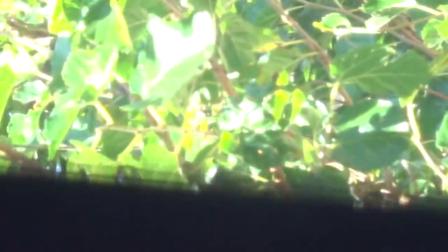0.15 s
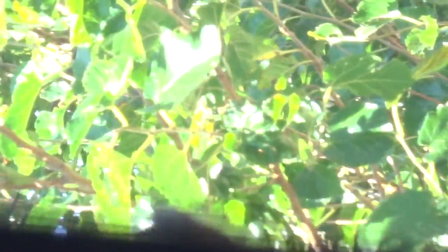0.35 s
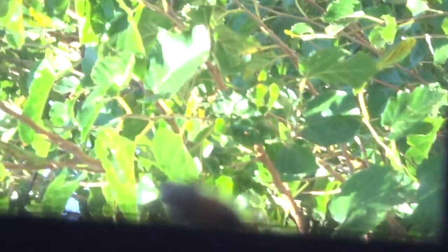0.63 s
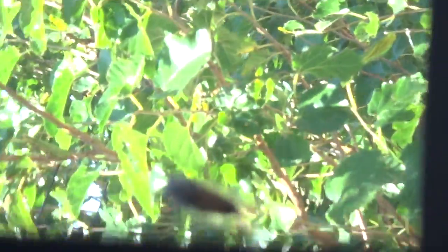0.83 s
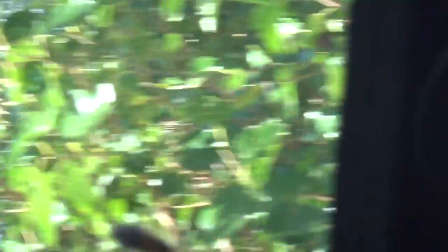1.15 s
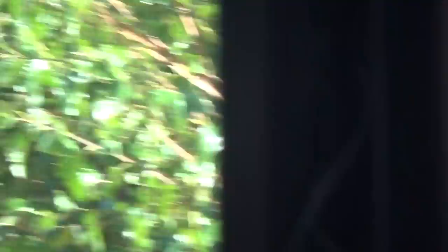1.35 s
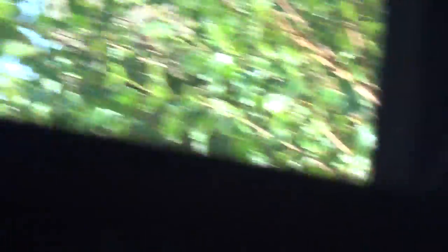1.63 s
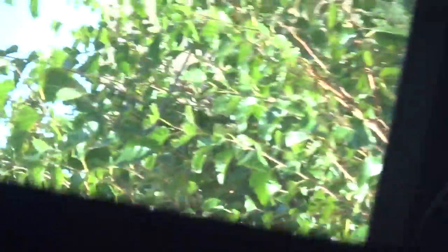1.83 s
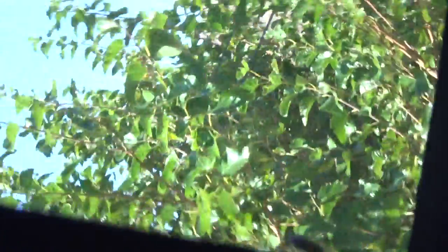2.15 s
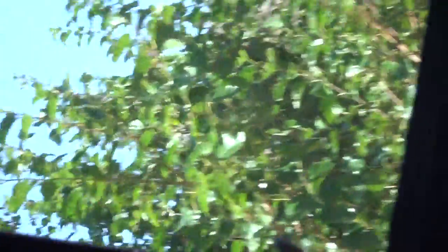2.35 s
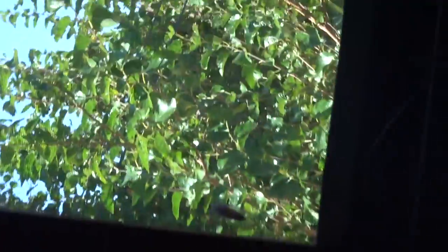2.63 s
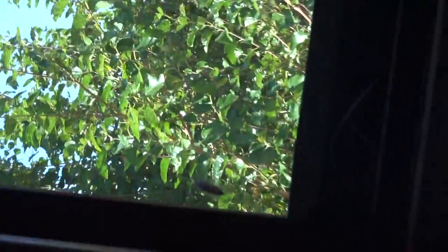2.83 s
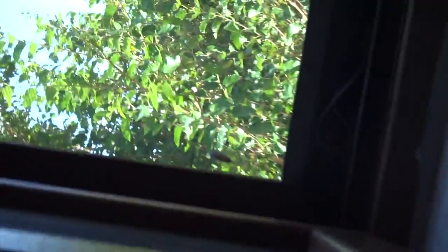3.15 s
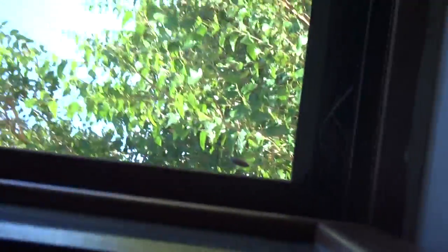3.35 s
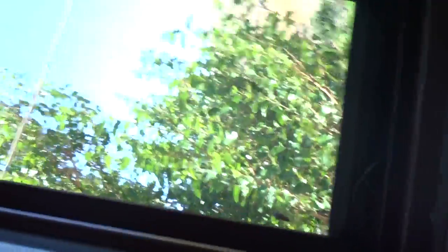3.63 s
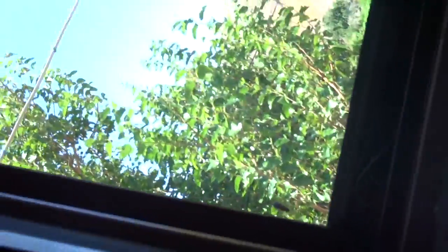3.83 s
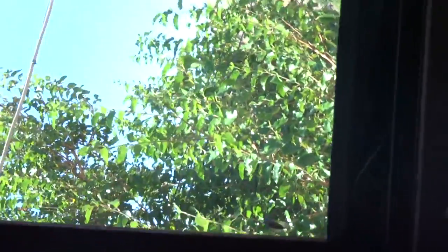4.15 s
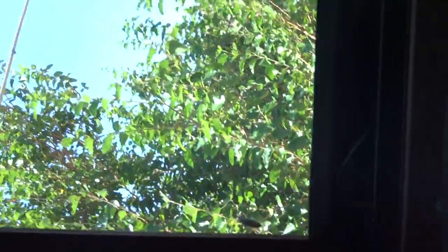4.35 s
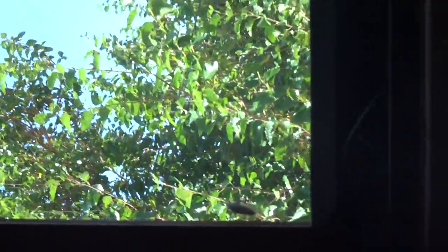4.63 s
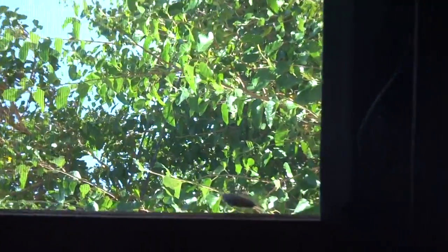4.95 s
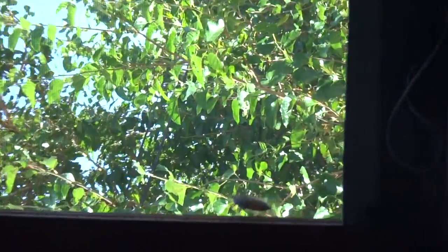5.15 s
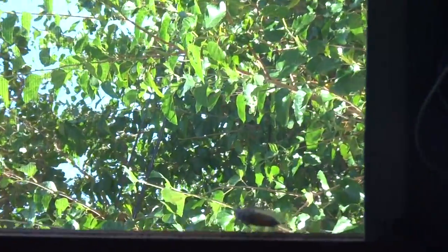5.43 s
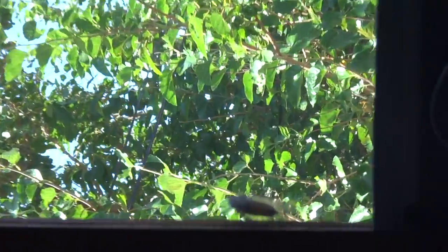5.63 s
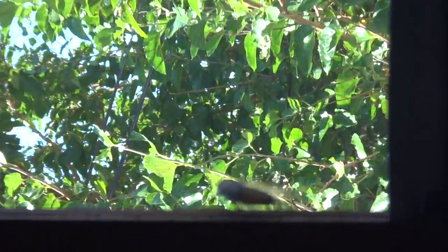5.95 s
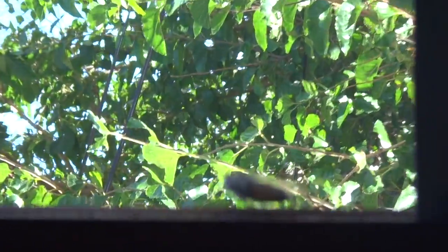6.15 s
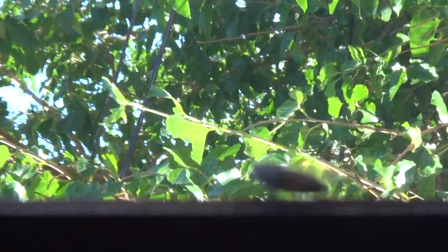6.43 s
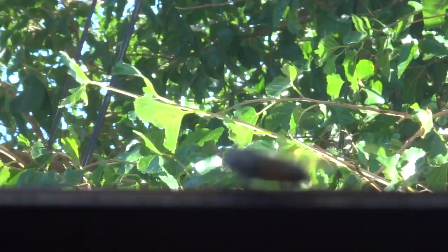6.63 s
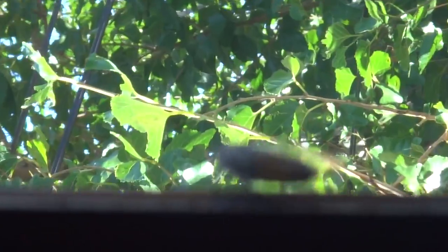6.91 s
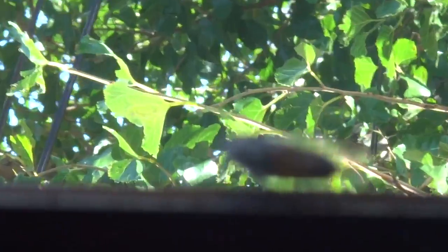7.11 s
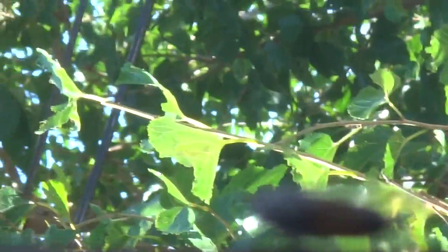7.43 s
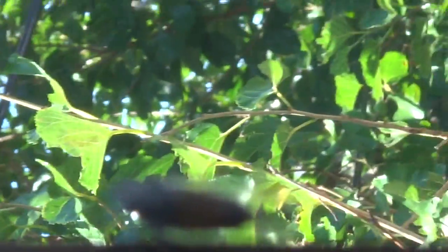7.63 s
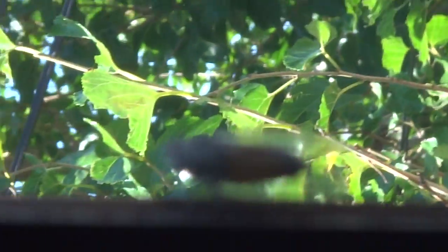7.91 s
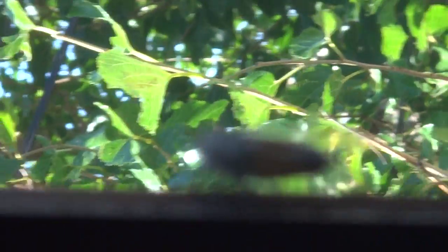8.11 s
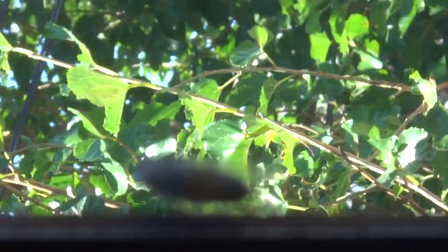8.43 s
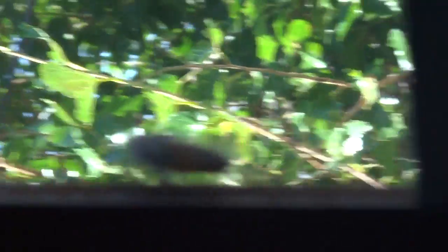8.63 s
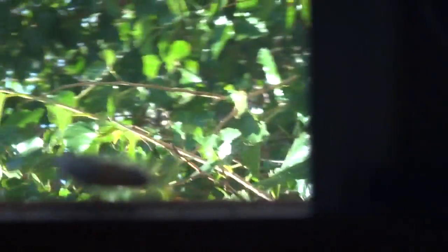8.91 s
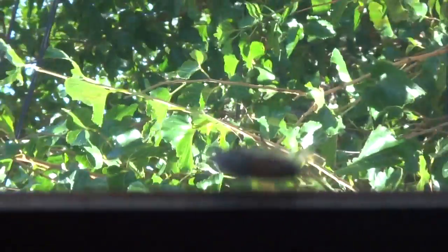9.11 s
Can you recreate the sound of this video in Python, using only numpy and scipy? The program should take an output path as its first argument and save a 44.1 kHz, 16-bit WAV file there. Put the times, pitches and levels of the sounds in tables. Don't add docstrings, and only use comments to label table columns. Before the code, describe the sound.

Harsh metallic cicada pulses repeat steadily at close range near a window, over faint distant cicadas, fingers rubbing plastic and small sharp clicks.

```python
import sys
import numpy as np
from scipy import signal
from scipy.io import wavfile
from scipy.ndimage import uniform_filter1d

SR = 44100
rng = np.random.default_rng(int(sys.argv[2]) if len(sys.argv) > 2 else 0)


def how_loud(loudness_db):
    steps = np.asarray(loudness_db, float) / 20
    return 10 ** steps


def generate_wav(signal):
    frames = np.transpose(np.atleast_2d(signal))
    scaled = np.clip(frames, -1, 1) * 32767
    pcm = np.round(scaled).astype(np.int16)
    wavfile.write(sys.argv[1], SR, pcm)


N = 408807


def evened(x):
    return x / np.sqrt(np.mean(x ** 2) + 1e-20)


def smoothed(x, *sizes):
    for size in sizes:
        x = uniform_filter1d(x, size=size)
    return x


def filtered(x, order, hz, kind):
    return signal.sosfilt(signal.butter(order, hz, kind, fs=SR, output="sos"), x)


def read(points, hz):
    f, value = np.transpose(points)
    return np.interp(np.log(hz + 1), np.log(f + 1), value)


def bump(hz, centre_hz, width_hz):
    return np.exp(-.5 * ((hz - centre_hz) / width_hz) ** 2)


def along(rows, column):
    rows = np.array(rows)
    return np.interp(np.arange(N) / SR, rows[:, 0], rows[:, column])


def ring(db):
    log = np.log(how_loud(np.maximum(db, -100)))
    log = np.concatenate([log, log[-2:0:-1]])
    return np.fft.ifft(np.exp(log - 1j * signal.hilbert(log).imag)).real[:1024]


def noise(spectrum, same=.9, patchy_db=3.5):
    frames, hz = N // 256 + 5, np.fft.rfftfreq(1024, 1 / SR)
    a, b, c, d, patches = rng.standard_normal((frames, 513, 5)).T
    patches = evened(uniform_filter1d(smoothed(patches, 8), size=8, axis=0))
    left = a + 1j * b
    right = same * left + np.sqrt(1 - same ** 2) * (c + 1j * d)
    z = np.array([left, right]) * how_loud(read(spectrum, hz)[:, None] + patchy_db * patches)
    return evened(signal.istft(z, nperseg=1024, noverlap=768)[1][:, :N])


# delay/s, f/Hz, level/dB, treble/dB, top/dB
RIBS = [
    (0, 4300, -.5, -2, 1),
    (.0007, 4750, 0, 3, 1),
    (.0014, 5150, -.8, -2, 0),
    (.0022, 5550, -1.3, -3, -2),
    (.003, 5400, -9, 4, -2),
]
# f/Hz, level/dB
BODY = [(1000, -106), (1700, -57.5), (2270, -27), (3700, -30.5), (4430, -5.5), (4780, -1), (5600, -5),
        (6260, -14.5), (7010, -31), (7700, -15.5), (9030, -26.5), (9920, -9.5), (11600, -30.5),
        (16000, -40.5)]
# t/s, effort/dB, length/s
BURSTS = [(-.02, -27, 0.086), (0.134, -25, 0.074), (0.279, -24.5, 0.085), (0.435, -23, 0.089),
          (0.599, -22.5, 0.086), (0.749, -21.5, 0.088), (0.898, -21, 0.089), (1.045, -21, 0.11),
          (1.2053, -20.5, 0.088), (1.352, -19, 0.075), (1.486, -19.5, 0.081), (1.639, -22.5, 0.1),
          (1.815, -23.5, 0.089), (1.966, -22, 0.083), (2.1213, -22, 0.097), (2.293, -22, 0.097),
          (2.451, -22.5, 0.085), (2.62, -22.5, .11), (2.799, -21, 0.089), (2.962, -21, 0.093),
          (3.108, -21.5, 0.076), (3.242, -21.5, 0.094), (3.398, -22, 0.087), (3.558, -24.5, 0.079),
          (3.697, -22.5, 0.097), (3.858, -22, 0.091), (4.0305, -20.5, 0.097), (4.225, -19.5, .11),
          (4.425, -21, 0.092), (4.626, -24.5, 0.09), (4.825, -23, 0.086), (5.013, -24.5, 0.1),
               (5.206, -23, 0.095), (5.382, -23.5, 0.09), (5.569, -24, 0.079), (5.7224, -23, 0.089),
               (5.9, -22, 0.089), (6.068, -23.5, 0.074), (6.221, -23, 0.08), (6.387, -24, 0.087),
               (6.557, -24.5, 0.089), (6.738, -21, 0.08), (6.921, -19, 0.066), (7.1033, -20, 0.064),
               (7.283, -21, 0.072), (7.439, -20.5, 0.085), (7.609, -20.5, 0.078), (7.76, -20.5, 0.087),
               (7.929, -21.5, 0.093), (8.093, -21, 0.079), (8.263, -22.5, 0.097), (8.45, -25, 0.086),
               (8.6097, -25.5, 0.089), (8.776, -26.5, 0.088), (8.946, -26.5, 0.091), (9.122, -29, 0.098)]


def cicada():
    buckles_per_s, swell_db, release_db_per_s = 228.5, 3.0, 1700
    first_rest_s, rest_spread_s = .0025, .0006
    run_up_s, run_up_buckles = .0013, 2.2
    first_db, first_stretch = 0.5, 1.3
    beat_jitter_s, rib_jitter_s, uneven_db = .00009, .00002, .6
    rib_db, rib_width_hz = 15, 310
    count = np.arange(40)
    snaps = np.zeros((len(RIBS), N))
    for s, effort_db, length in BURSTS:
        late, size = rng.standard_normal((2, len(RIBS) + 1, 40))
        run_up = run_up_s * (1 - np.exp(-np.maximum(count - 1, 0) / run_up_buckles))
        rest = first_rest_s + rest_spread_s * size[-1, 0] + run_up + beat_jitter_s * late[-1]
        beat = count / buckles_per_s + rest * (count > 0)
        effort_db = effort_db + swell_db * beat / length + first_db * (beat == 0)
        effort_db -= release_db_per_s * np.maximum(beat - length + 0.0074, 0)
        stretch = np.where(beat > 0, 1, first_stretch)
        for k, (delay, _, db, _, _) in enumerate(RIBS):
            at = s + beat + delay * stretch + rib_jitter_s * late[k]
            keep = (beat < length + .012) & (at >= 0) & (at < N / SR)
            snaps[k, (at[keep] * SR).astype(int)] += how_loud(effort_db + db + uneven_db * size[k])[keep]

    hz = np.fft.rfftfreq(2048, 1 / SR)
    body_db = read(BODY, hz)
    song = np.zeros(N)
    for k, (_, rib_hz, _, treble_db, top_db) in enumerate(RIBS):
        low_db = 2 * treble_db - 1
        lift_db = rib_db * bump(hz, rib_hz, rib_width_hz) - 7.96 * bump(hz, 5192, 710)
        lift_db += treble_db * bump(hz, 6800, 1170) + top_db * bump(hz, 9900, 900)
        lift_db += low_db * bump(hz, 2440, 650)
        song += signal.oaconvolve(snaps[k], ring(body_db + lift_db))[:N]
    return song * how_loud(19.5) / np.linalg.norm(ring(body_db))


# delay/s, level/dB
FRAME = [(.0006, -25), (.0023, -11.5), (.0038, -9.5), (.0049, -16), (.0061, -22.5), (.0083, -13.5)]
# t/s, turn to the insect as treble/dB, tilt as glint off the pane/dB,
# left-right/dB, room/dB
POSE = [(0, 7, -0.5, -7, 2), (.4, 7, 1, -6.5, -2), (.95, 6.5, 3.5, -7.5, -6.5), (1.5, 4, 2.5, -6.5, -8),
        (1.9, 2.5, -1.5, -8.5, -4.5), (2.7, 0.5, 4, -8, -5.5), (3.3, -2, 4.5, -8, -8.5),
        (3.7, 1, 6, -8, -5), (4.05, -1, 11.5, -6.5, -5), (4.35, 0.5, 6, -8.5, -8),
        (4.9, -2, 10, -8.5, -8.5), (5.55, 1, 3, -9, -9.5), (5.95, -4.5, 8.5, -10, -8.5),
        (6.45, -1, 5, -9.5, -12.5), (7.1, 1, 7.5, -7.5, -8.5), (8.1, 4, 6, -8, -13),
        (8.45, 6, 11, -6.5, -10.5), (9.2, 9.5, 5, -8, -11.5)]


def window_frame(x):
    taps = np.zeros((2, 1024))
    for k, (s, db) in enumerate(FRAME):
        at = round(s * SR)
        taps[0, at + 1 + k % 2] = taps[1, at] = how_loud(db) * (-1) ** k
    sent = x * how_loud(4.5 + 0.62 * along(POSE, 4))
    echoes = signal.oaconvolve(sent[None], taps, axes=1)[:, :N]
    return np.array([np.roll(x, 1), x]) * how_loud(-0.3) + echoes


def toned(x):
    top_db, low_db = 1 - 0.3 * along(POSE, 1), 3.1
    top = filtered(x, 2, 6500, "high")
    low = filtered(x, 2, 3300, "low")
    return x + top * (how_loud(top_db) - 1) + low * (how_loud(low_db) - 1)


# f/Hz, t60/s
ROOM = [(2500, 0.53), (4500, 0.25), (6000, 0.32), (10000, 0.25), (14000, 0.3)]


def room(x):
    same = 0.58
    out, turn = np.zeros((2, N)), np.pi * .9 * np.arange(N) / SR
    for k in range(3):
        taps = np.zeros((2, SR // 3))
        at = np.arange(560, SR // 3 - 20, 20)
        at = at + rng.integers(0, 20, (2, len(at)))
        np.put_along_axis(taps, at, rng.choice([-1., 1.], at.shape), 1)
        taps[1] = same * taps[0] + np.sqrt(1 - same ** 2) * taps[1]
        hz, t, z = signal.stft(taps, SR, nperseg=256)
        tail = signal.istft(z * how_loud(-60 * t / read(ROOM, hz)[:, None]), SR, nperseg=256)[1]
        tail /= np.linalg.norm(tail[0])
        share = np.sqrt(2 / 3) * np.cos(turn + k * np.pi / 3)
        out += signal.oaconvolve((x * share)[None], tail, axes=1)[:, :N]
    return out


# f/Hz, width/Hz, level/dB
MIC = [(2250, 270, 1.5), (3305, 92, 10), (3440, 29, -10.5), (7150, 155, -3), (10140, 79, 2),
       (10900, 140, 2.5), (12050, 130, 6), (13600, 250, -8), (14500, 300, 5), (15400, 300, 5)]
# f/Hz, left-right/dB
LEAN = [(60, 13), (92, -1), (140, 0.0), (210, -10), (330, -11), (500, -5), (770, -7), (1170, -16),
        (1790, 0.5), (2740, 0), (4190, 0.5), (6410, -11.5), (9810, -2), (15000, 9.5)]
# f/Hz, width/Hz, level at rest/dB, share of turn, share of tilt
AIM_BANDS = [(2440, 1240, -3, 1, 0.033), (5550, 500, 1, 0.057, 0.34), (6520, 565, 4.5, 1, 0.31),
             (8280, 880, -0.1, 0.56, 1), (11230, 240, 3, -1.35, 0.45), (13700, 1830, 2, 0.47, .05)]
# width/Hz, then a path of t/s, f/Hz, level/dB
CRESTS = [
    (110, [(0, 4900, 7.5), (1.6, 4960, 6), (2.2, 4750, 1.5), (3, 4560, 1.5), (3.8, 4670, 5.5), (4.8, 4670, 4.5), (5.6, 5010, 2), (8.2, 4690, 4.5), (9.2, 4460, 4)]),
    (90.5, [(0, 5290, 9), (1.6, 5400, 8.5), (2.8, 5350, -0.5), (3.8, 5330, 1), (5, 5440, 0.5), (5.9, 5230, 5), (7.4, 5500, 5), (9.2, 5170, 2)]),
    (100, [(0, 5640, 6), (1.6, 5780, -0.5), (2.7, 5800, -1), (4.5, 5600, 6.5), (6, 5700, -0.5), (7.8, 5850, 1), (9.2, 5700, 2)]),
    (150, [(0, 3670, 6), (1.5, 3760, 11.5), (2.8, 3750, 11), (4.2, 3730, 10.5), (5.5, 3730, 2.5), (7, 3840, 6.5), (8.5, 3820, 8.5)]),
    (400, [(0, 13600, 5), (2, 13700, -7), (3.3, 13000, -1), (4.5, 13500, 2), (6.5, 13300, 3), (8.5, 13200, 5), (9.2, 13000, -6)]),
]
# width/Hz, then a path of t/s, f/Hz, level/dB
DIPS = [
    (69.4, [(0, 5020, -3), (2, 5080, -4), (3, 5070, -6), (4.3, 5000, -2), (5.3, 5220, -16), (5.8, 5140, -7), (7.3, 5200, -3), (8.3, 5070, -4)]),
    (111, [(0, 5500, -6.5), (2.8, 5530, -4), (4, 5550, -6), (5, 5500, -9), (6, 5670, 1.5), (7.8, 5650, -0.5), (9.2, 5450, -2)]),
    (142, [(0, 6030, -3.5), (1.8, 6000, 2), (2.7, 5860, -12.5), (3.8, 5800, -2.5), (4.5, 6260, 1), (6.3, 6180, -12.5), (8.3, 6260, -2), (9.2, 6560, -3)]),
    (120, [(0, 8700, -4), (2.8, 8900, -6.5), (5.3, 9300, -5.5), (6.5, 8800, -3), (7.6, 8900, -2), (9.2, 9000, -5)]),
    (250, [(0, 12050, -1), (2, 11800, 4), (3, 11340, -15), (4.2, 12000, -6), (5, 12100, 0), (7, 11330, -14), (9.2, 11600, 5)]),
    (81.5, [(0, 2250, 6.5), (2.3, 2250, 3.5), (5, 2250, 10.5), (7, 2230, 3), (8.3, 2190, -1)]),
]


def aim(x):
    hz, t, z = signal.stft(x, SR, nperseg=1024)
    at = np.minimum((t * SR).astype(int), N - 1)
    turn_db, tilt_db, side_db = (along(POSE, k)[at] for k in range(1, 4))
    colour_db = sum(db * bump(hz, f, width) for f, width, db in MIC)[:, None]
    colour_db = colour_db + np.outer(bump(hz, 10150, 3100), turn_db - 2.5)
    for f, width, db, turn, tilt in AIM_BANDS:
        colour_db += np.outer(bump(hz, f, width), db + turn * turn_db + tilt * tilt_db)
    for width, path in CRESTS + DIPS:
        s, f, db = np.transpose(path)
        colour_db += np.interp(t, s, db) * bump(hz[:, None], np.interp(t, s, f), width)
    ripple = uniform_filter1d(rng.standard_normal(z.shape[1:]), size=3, axis=0)
    colour_db += 1.88 * evened(smoothed(ripple, 70, 70))
    mirrored = np.concatenate([colour_db, colour_db[-2:0:-1]])
    phase = signal.hilbert(mirrored, axis=0).imag[:len(hz)]
    z = z * np.exp(-1j * phase * np.log(10) / 20)
    lean_db = read(LEAN, hz)[:, None] + np.outer(bump(hz, 4600, 3000), side_db + 6.5)
    gain_db = colour_db + np.array([lean_db, -lean_db]) / 2
    return signal.istft(z * how_loud(gain_db), SR, nperseg=1024)[1][:, :N]


# f/Hz, level/dB
CHORUS = [(1000, -83), (1700, -35), (2340, -50), (3600, -21.5), (4340, 7.5), (4770, -1), (5760, -22),
          (6880, -17.5), (7700, -42), (9110, -38), (10200, -27), (11900, -51), (16000, -62)]


def far_cicadas():
    return how_loud(-38.5) * noise(CHORUS, same=.85)


# t/s, level/dB, f/Hz, t60/s
TICKS = [
    (4.598, -47, 905, 0.15),
    (4.598, -44, 330, 0.076),
    (4.6, -36, 2130, 0.032),
    (4.598, -52, 8900, .03),
    (6.833, -56, 250, 0.026),
    (6.833, -57, 60, 0.042),
    (7.43, -64, 150, .04),
]
# t/s, peak level/dB, low f/Hz, high f/Hz
CLICKS = [(2.085, -34, 9600, 12500), (2.126, -34, 10500, 12600), (2.234, -33, 11000, 12700),
          (2.243, -40, 9500, 12500), (2.279, -26, 8000, 13500), (3.6527, -30, 9400, 10800),
          (3.6732, -25, 3200, 4600), (3.6728, -28, 8900, 11500), (3.6735, -46, 800, 2600),
          (3.679, -31, 6800, 8200), (3.6865, -28, 8800, 11500), (3.818, -26, 6500, 15600),
          (4.377, -36, 6960, 13000), (4.7474, -19, 3500, 7000), (4.7474, -17, 7500, 15500),
          (4.7783, -34, 9400, 13200), (4.8068, -30, 5500, 10500), (4.997, -42, 8000, 14000),
          (7.9025, -20, 3600, 5500), (7.9025, -21, 5970, 10500), (8.245, -46, 8000, 14000),
          (9.235, -44, 11000, 15800)]


def casing():
    out, t = np.zeros(N + SR), np.arange(3000) / SR
    for s, db, hz, t60 in TICKS:
        snap = np.sign(rng.standard_normal(3000)) * how_loud(db - 60 * t / t60)
        tick = filtered(snap, 5, [hz * .8, min(hz * 2.2, 18000)], "band")
        out[round(s * SR):][:3000] += tick * np.sqrt(SR / (3 * hz))
    contacts = np.bincount([0, 38, 90], [.7, 1, -.5], 400)
    for s, db, low_hz, high_hz in CLICKS:
        click = filtered(contacts, 3, [low_hz, high_hz], "band")
        out[round((s - .0008) * SR):][:400] += how_loud(db + 6.0) * click / abs(click).max()
    return out[:N]


ZOOM_HZ, FOCUS_HZ = 14400, 15200
# start t/s, stop t/s, f/Hz, level/dB
WHINES = [
    (2.234, 2.827, ZOOM_HZ, -53),
    (2.544, 3.106, FOCUS_HZ, -52),
    (5.15, 5.6, FOCUS_HZ, -60),
    (5.505, 6.03, ZOOM_HZ, -53),
    (0.97, 1.404, 413, -52.5),
    (1.565, 1.742, 393, -50),
    (4.86, 5.597, 413, -79),
    (5.596, 6.8, 408, -87),
]


def zoom_motor():
    t, whine = np.arange(N) / SR, np.zeros(N)
    for start, stop, hz, db in WHINES:
        u = t[:round((stop - start) * SR)]
        fade = np.clip(np.minimum(u, u[::-1]) / 0.029, 0, 1)
        whine[round(start * SR):][:len(u)] += how_loud(db) * np.sin(2 * np.pi * hz * u) * fade
    flutter = evened(smoothed(rng.standard_normal(N), 700, 700))
    return whine * how_loud(4.5 * flutter - 1.5)


# t/s, level/dB
GRIP = [(0, -94), (.9, -77), (1.3, -66.5), (2.5, -84), (3.1, -74.5), (3.3, -83), (4.3, -80), (4.9, -95),
        (9.27, -86.5)]


def touches(rows, peak_s, rise_db_per_s, fall_db_per_s, lift_db, rest_db):
    t = np.arange(0, N / SR + .01, .002)
    s, db = np.transpose(rows)
    late = t[:, None] - s - peak_s
    shape_db = np.minimum(rise_db_per_s * late, -fall_db_per_s * late)
    gain = np.linalg.norm(how_loud(db + lift_db + shape_db), axis=1)
    return np.interp(np.arange(N) / SR, t, gain) + how_loud(along(GRIP, 1) + rest_db)


# t/s, level/dB
THUMPS = [(0.568, -66), (0.702, -63), (0.997, -71), (1.36, -67), (1.429, -66), (1.529, -64), (1.754, -46),
          (2.066, -54), (2.271, -55), (2.401, -59), (2.529, -66), (2.779, -64), (2.848, -58), (2.899, -63),
          (3.099, -79), (3.4, -71), (3.479, -52.5), (3.569, -54), (3.639, -65), (3.967, -51), (4.193, -66),
          (4.587, -67), (4.73, -74), (6.182, -59), (8.33, -77), (8.9, -68)]
# t/s, level/dB
KNOCKS = [(0.567, -56), (0.994, -57), (1.097, -64), (1.174, -55), (1.306, -59), (1.427, -55), (1.622, -57),
          (1.758, -45.5), (1.887, -81), (2.393, -59), (2.561, -60), (2.798, -66), (2.899, -69),
          (3.489, -72), (3.586, -68), (4.388, -70), (4.603, -62.5), (4.71, -62), (6.829, -76), (8.889, -78)]
# t/s, level/dB
RUBS = [(0.55, -48), (0.969, -53.5), (1.042, -55), (1.157, -47), (1.238, -55), (1.309, -48), (1.369, -55),
        (1.595, -46), (1.679, -52), (2.337, -69), (2.391, -48), (2.56, -54.5), (3.361, -70), (3.493, -59.5),
        (3.673, -67), (4.331, -68), (4.421, -73), (5.183, -81), (7.418, -88), (8.889, -72)]
# f/Hz, level/dB
RUB = [(150, -43), (280, -6.5), (350, -9.5), (402, 3), (450, -10), (752, -5.5), (1100, -8), (1520, -19.5),
       (2000, -11), (2600, -25)]


def hand():
    thump = noise([(15, 1.0), (45, -1.0), (90, -9.0), (150, -24), (300, -48)], same=1.0)
    knock = noise([(90, -28), (140, -4.0), (205, 0.5), (260, -8.5), (400, -25.0)], same=0.97, patchy_db=2)
    rub = noise(RUB)
    out = thump * touches(THUMPS, 0.022, 700, 280, 5.7, 4.8)
    out += knock * touches(KNOCKS, 0.008, 620, 290, 7.5, 3.1)
    return out + rub * touches(RUBS, 0.012, 540, 183, 4.3, 5.7)


# t/s, level/dB
HUM = [(0, -63.5), (.5, -60.5), (1.42, -64), (1.62, -62), (2.25, -66), (2.42, -68), (2.55, -78),
       (3.41, -88), (3.64, -78), (3.95, -84), (4.23, -73), (4.39, -72), (4.52, -84), (4.83, -84),
       (6.56, -90.5), (7.2, -81.5), (9.27, -87.5)]


def hum():
    near_db = along(HUM, 1)
    hz = 1087.5 + .6 * evened(smoothed(rng.standard_normal(N), 8000))
    tone = np.sqrt(2) * np.sin(2 * np.pi * np.cumsum(hz) / SR) * how_loud(near_db + 8.0)
    hiss = noise([(950, -28.5), (1090, -12.0), (1180, -9.0), (1300, -22.0), (1500, -26.5)], same=0.3)
    return tone + hiss * how_loud(-53.5 + 0.71 * (near_db + 67.5))


def masked(song):
    level = smoothed(abs(song), 1500, 900)
    share = np.minimum(0.7 * level / (smoothed(level, 20000) + 1e-9), 1)
    return how_loud(5.5 * (0.5 - share))


# f/Hz, level/dB
AIR = [(12, -37), (20, -8), (259, -10.5), (499, -5.5), (654, -13), (999, -9.5), (1100, -15), (1280, -5),
       (1470, -10), (1850, -12), (2000, -15), (2600, -45), (4400, -120)]


def room_air():
    return how_loud(-72) * noise(AIR, same=0.14)


def scene():
    song = cicada()
    walls = room(toned(song) * how_loud(along(POSE, 4) + 3.0))
    singing = aim(window_frame(song) + walls + far_cicadas())
    quiet = casing() + zoom_motor() + hand() + hum() * masked(song) + room_air()
    return singing + quiet * how_loud(np.array([[-.4], [.4]]))


# f/Hz, share of bands muted
STARVED = [(2900, 0), (3150, .08), (3350, 0), (3550, .28), (3750, 0), (10900, 0), (11700, .42),
           (12400, .25), (13600, .35), (15000, .1)]


def starved(x):
    hz, t, z = signal.stft(x, SR, nperseg=1024)
    chance = rng.random((len(hz) // 8 + 1, len(t) // 4 + 1))
    chance = chance.repeat(8, 0).repeat(4, 1)[:len(hz), :len(t)]
    power = uniform_filter1d(abs(z) ** 2, size=7, axis=0)
    weak = np.where(power < .3 * np.mean(power, axis=1, keepdims=True), 1.8, .95)
    level_db = 10 * np.log10(power.sum(0) + 1e-12)
    pause = np.clip((smoothed(level_db, 30) + 2 - level_db) / 8, 0, 1)
    z = z * how_loud(-5 * np.outer(hz > 11300, pause))
    gaps = np.where(chance < weak * read(STARVED, hz)[:, None], .02, 1)
    return signal.istft(z * gaps, SR, nperseg=1024)[1][:N]


def roll_off(x):
    return signal.sosfilt(signal.butter(12, 16630, fs=SR, output="sos"), x)


def record(dry):
    power_db = 10 * np.log10(signal.lfilter([.004], [1, -.996], (dry ** 2).mean(0)) + 1e-12)
    fall = np.arange(N) * 69.0 / SR
    over_db = np.maximum(np.maximum.accumulate(power_db + fall) - fall + 28.5, 0)
    ducked = dry / how_loud(.5 * over_db)
    quick_db = 10 * np.log10(abs(smoothed((ducked ** 2).mean(0), 40, 40)) + 1e-12)
    shave_db = .35 * np.maximum(quick_db + 17, 0)
    left, right = ducked / how_loud(smoothed(shave_db, 60, 60))
    mid_filter = signal.firwin(511, 15750, fs=SR)
    side_filter = signal.firwin2(255, [0, 10300, 11600, SR / 2], [1, 0.65, 0.1, .22], fs=SR)
    mid = signal.oaconvolve(starved((left + right) / 2), mid_filter, "same")
    side = signal.oaconvolve((left - right) / 2, side_filter, "same")
    return roll_off(np.array([mid + side, mid - side]))


dry = scene()
out = record(dry)
generate_wav(out)
```